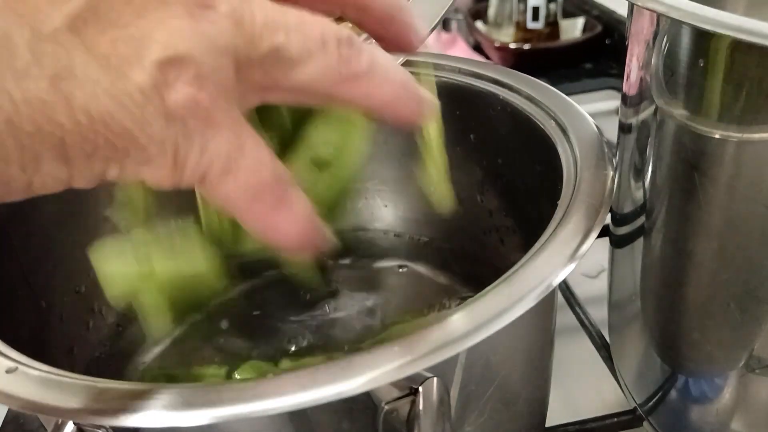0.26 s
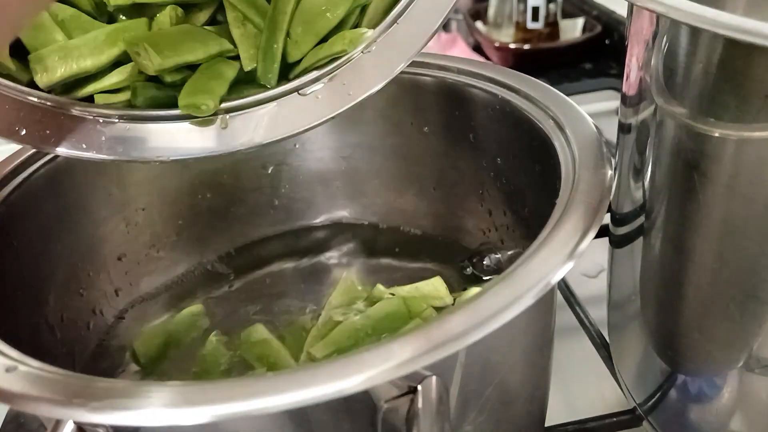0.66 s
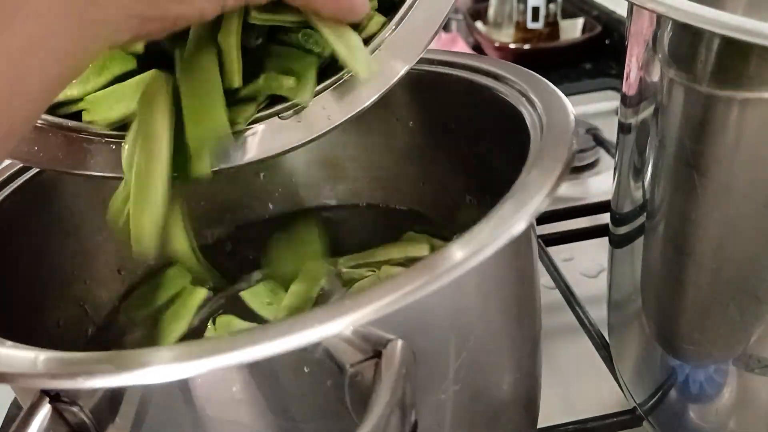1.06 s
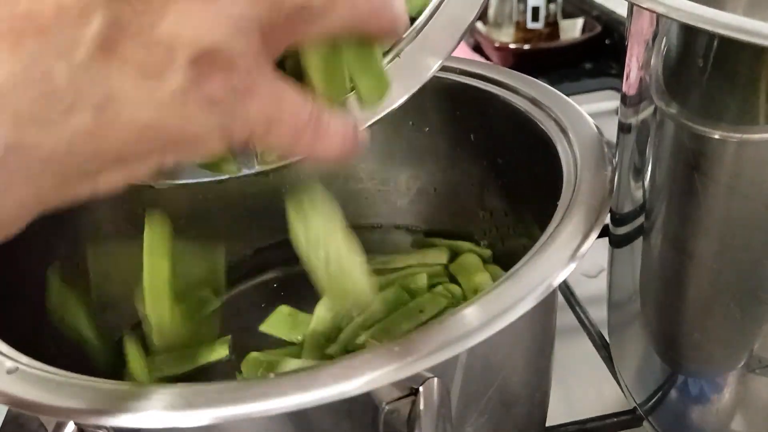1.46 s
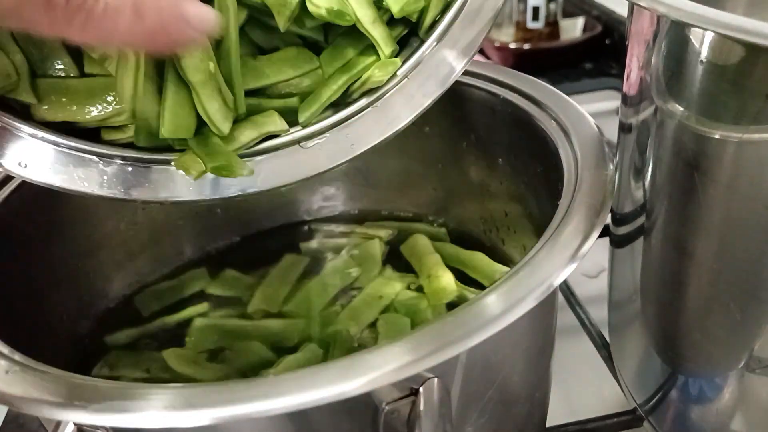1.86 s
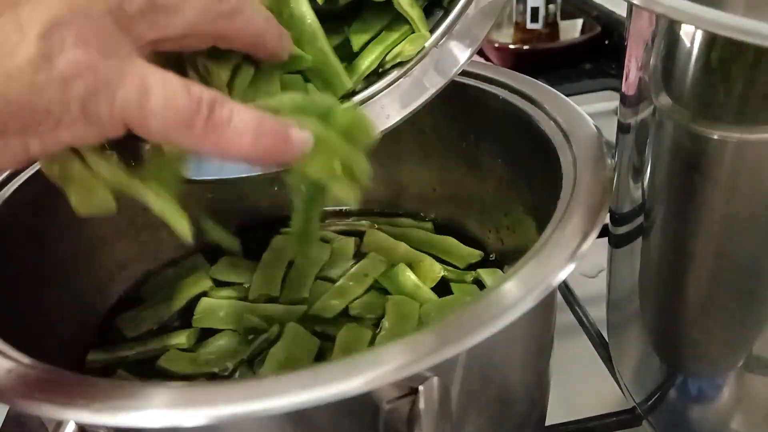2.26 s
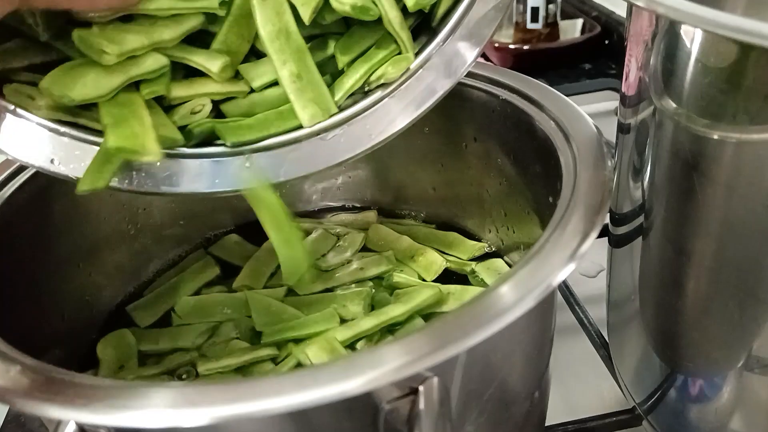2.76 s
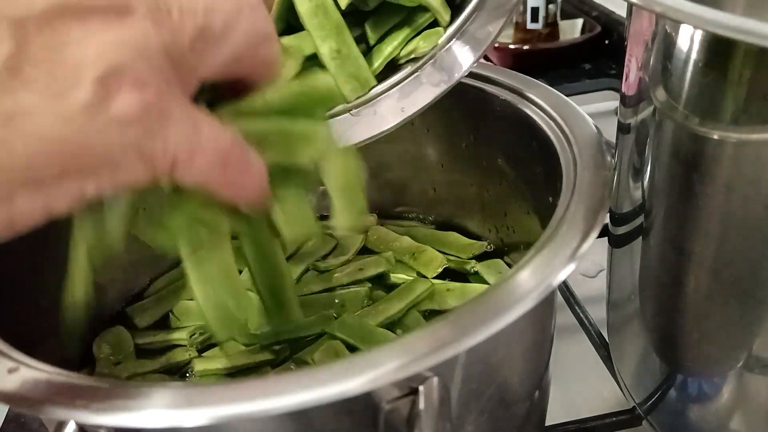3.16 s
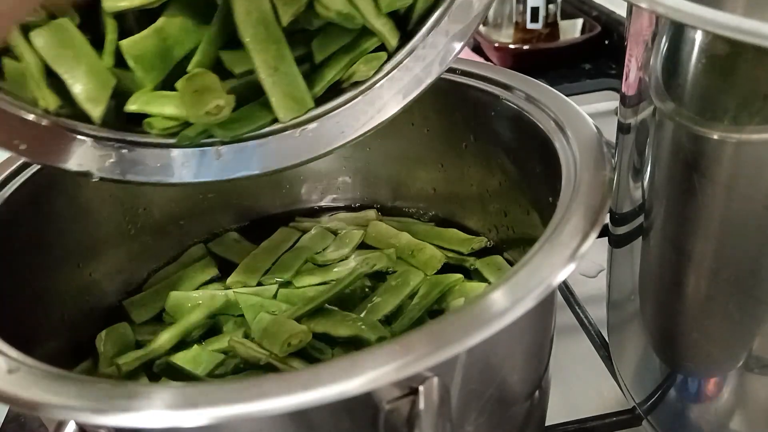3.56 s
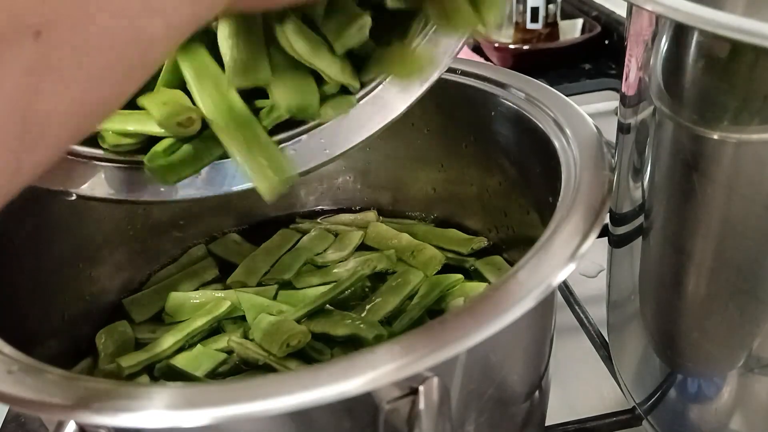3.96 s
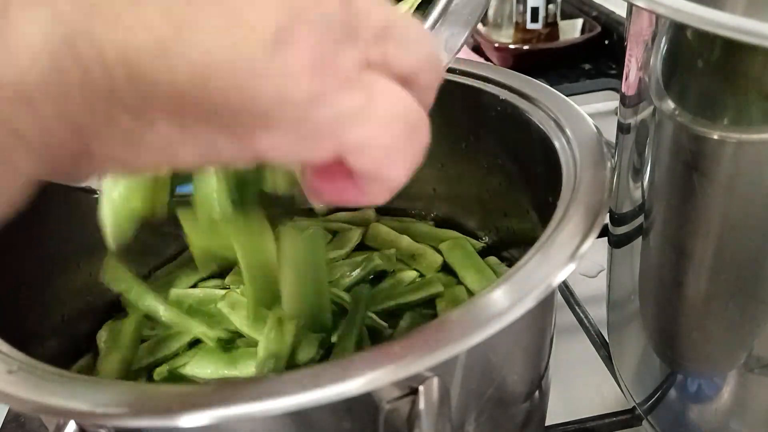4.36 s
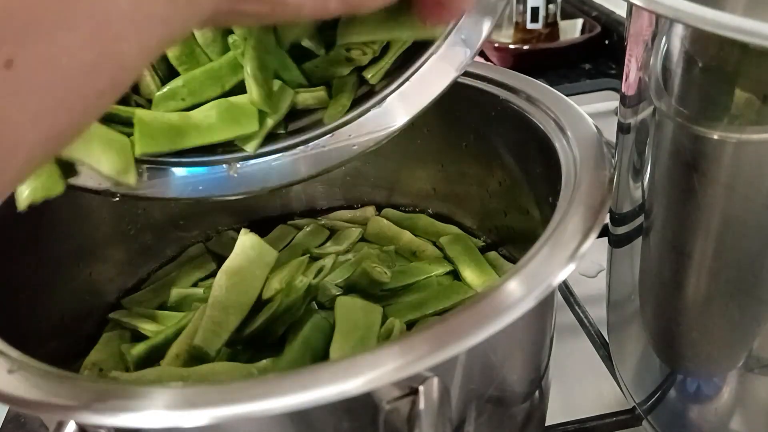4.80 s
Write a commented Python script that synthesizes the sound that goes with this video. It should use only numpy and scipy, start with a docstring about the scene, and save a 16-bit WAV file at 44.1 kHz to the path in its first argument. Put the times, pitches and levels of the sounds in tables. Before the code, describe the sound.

Close by, cut beans drop into water in a steel pot, splashing then thudding hollowly over a softly hissing gas flame.

```python
"""Cut green beans drop by the handful into a pot of water on a gas ring, heard close in a small kitchen.
The first splash and plop, later ones thud on the floating heap; every landing rings the pot's hollow.
Between handfuls, fingers rake the damp pods through a steel bowl: they rustle, squish and squeak.
Underneath, the pot murmurs, the flame rumbles and the gas jet hisses.
A stereo pair of microphones stands at the stove, with pot and jet a little to the left."""
import sys
import numpy as np
from scipy import signal
from scipy.fft import rfft, irfft, next_fast_len
from scipy.io import wavfile
from scipy.ndimage import uniform_filter1d

SR = 44100
rng = np.random.default_rng(int(sys.argv[2]) if len(sys.argv) > 2 else 0)


def waveform_to_disk(signal):
    """Save audio, clipped to [-1, 1], as 16-bit WAV at the path in sys.argv[1]."""
    frames = np.transpose(np.atleast_2d(signal))
    scaled = np.clip(frames, -1, 1) * 32767
    samples = np.round(scaled).astype(np.int16)
    wavfile.write(sys.argv[1], SR, samples)


N = 221990
TIME = np.arange(N) / SR
AGE = TIME[:SR // 2]   # seconds since a hit began

# clumps landing in the pot: (time [s], level [dB], slap against that level [dB])
LANDINGS = [(0.03, -36, -34), (0.160, -36, -30), (0.233, -35.5, -5.5), (0.296, -28, -24),
            (0.388, -23, -15.5), (0.433, -32, -9), (0.481, -31, -2.5), (0.498, -21.5, -8.5),
            (0.543, -21.5, -18), (0.68, -27.5, -59), (1.388, -5, -9.5), (1.414, -13, -19.5),
            (1.444, -16, -21), (1.642, -24, -15), (1.654, -23.5, -10), (1.776, -22, -45),
            (1.814, -18.5, -8.5), (1.850, -21.5, -5.5), (1.883, -18.5, -14), (1.933, -26.5, -15.5),
            (2.031, -21, -23), (2.046, -20, -37), (2.091, -18, -22.5), (2.108, -19.5, -34),
            (2.173, -29, -28), (2.25, -33.5, -5.5), (2.281, -18.5, -33), (2.48, -21, -17),
            (2.515, -22.5, -20), (2.573, -28, -28), (2.599, -15.5, -19), (2.655, -23.5, -9),
            (2.709, -23, -18.5), (2.73, -25, -31), (2.772, -23.5, -28.5), (3.02, -32, -19),
            (3.119, -11.5, -21), (3.231, -16, -26.5), (3.24, -17, -40), (3.394, -24.5, -40),
            (3.452, -29, -13), (3.514, -22, -24), (4.267, -21, -16.5), (4.306, -29, -30), (4.338, -21, -16),
            (4.454, -27, -10.5), (4.632, -35, -10), (4.657, -24.5, -12), (4.69, -31, -10.5),
            (5.02, -25, -8.5)]
# handfuls pouring in: (full flow from [s], hold [s], build-up [s], tumble [dB], squelch [dB])
HANDFULS = [(0.208, 0.1, 0.15, -47.5, -45), (0.476, 0.071, 0.22, -35.5, -31.5),
            (1.406, 0.12, 0.36, -33.5, -39), (1.84, 0.082, 0.78, -44, -60), (2.601, 0.11, 0.57, -40, -42.5),
            (3.385, 0.16, 0.12, -37, -51.5), (4.313, 0.053, 0.11, -35, -37), (4.60, 0.069, 0.15, -34, -46)]
# smacks on the water and bursting drops: (time [s], ping pitch [Hz], snap [dB], spit [dB])
SMACKS = [(0.206, 8200, -28, -41.5), (0.234, 9280, -35, -55), (0.349, 8240, -26.5, -49),
          (0.4317, 7200, -27, -73), (0.4544, 9000, -10, -57), (0.583, 7430, -26, -58),
          (0.59, 7460, -30, -70), (1.3018, 8470, -21, -52), (1.328, 8000, -19.5, -47),
          (1.35, 8250, -6.5, -19), (1.3896, 7110, -16, -22.5), (1.835, 7700, -21, -44),
          (1.904, 6100, -16, -68), (2.601, 7100, -29.5, -48), (2.769, 7360, -32, -59.5),
          (3.118, 7470, -23.5, -41), (4.2673, 7390, -26.5, -57)]
# pitched plops in the water and brief ringing notes of the pot:
# (time [s], pitch [Hz], level [dB], t60 [s])
PLOPS_AND_NOTES = [(0.362, 523, -23, 0.11), (1.260, 1150, -20, 0.038), (1.332, 1167, -21.5, 0.056),
                   (1.359, 3344, -10.5, 0.13), (1.389, 966, -8.5, 0.11), (1.389, 514, -7, 0.17),
                   (1.390, 760, -17, 0.062), (1.398, 609, -13, 0.085), (1.395, 3024, -19, 0.22),
                   (1.435, 227, -22, 0.17), (1.505, 2925, -28, 0.12), (2.047, 1000, -32.5, 0.12),
                   (2.091, 612, -17, 0.13), (2.497, 1178, -17, 0.085), (2.644, 1160, -25.5, 0.045),
                   (2.675, 1160, -23.5, 0.038), (3.119, 480, -16.5, 0.069), (3.122, 303.4, -33, 0.5),
                   (3.128, 614.3, -20.5, 0.23), (3.484, 1190, -26.5, 0.092), (3.513, 796, -27.5, 0.069),
                   (4.341, 973, -30, 0.063), (4.563, 1200, -19.5, 0.052), (4.580, 1237, -23, 0.13),
                   (4.66, 527, -25, 0.086), (4.70, 680, -26, 0.13)]
# wet pods squashing together: (time [s], centre [Hz], level [dB])
SQUISHES = [(0.174, 1360, -45), (0.201, 2790, -38), (0.259, 2700, -42.5), (0.301, 2810, -43),
            (0.386, 1800, -39), (0.496, 2340, -35.5), (0.544, 2630, -36.5), (1.251, 2450, -42.5),
            (1.391, 2350, -32.5), (1.552, 1700, -37), (1.901, 2310, -41.5), (2.087, 2500, -45.5),
            (2.169, 1720, -49), (2.497, 2300, -47), (2.515, 2060, -39.5), (2.578, 2500, -48),
            (2.639, 2950, -42.5), (2.67, 2070, -38.5), (2.772, 2260, -46.5), (3.482, 1930, -40),
            (4.266, 1930, -36), (4.305, 2530, -39), (4.421, 2400, -41.5), (4.517, 2310, -42),
            (4.603, 2460, -36)]
# finger strokes through the bowl: (start [s], hold [s], level [dB])
RAKES = [(0, 0.014, -43), (0.814, 0.21, -43), (2.151, 0.24, -42), (2.493, 0.26, -46.5), (3.002, 0.19, -42),
         (3.434, 0.12, -50.5), (3.876, 0.22, -44), (4.034, 0.3, -41), (4.6, 0.052, -41),
         (4.867, 0.14, -41.5)]
# damp pods squeaking: (middle [s], half length [s], pitch [Hz], level [dB])
SQUEAKS = [(0.84, 0.0081, 6900, -27), (0.954, 0.0028, 7500, -29.5), (0.976, 0.012, 7360, -33.5),
           (1.703, 0.012, 7000, -38.5), (4.149, 0.012, 5170, -34), (4.2, 0.025, 5500, -44),
           (4.979, 0.006, 6900, -31.5)]
# fingers nudging the bowl: (time [s], level [dB], best excited pitch [Hz])
NUDGES = [(2.39, -21.5, 1670), (3.878, -31, 2100), (4.172, -36.5, 1200)]

# resonances: (frequency [Hz], level [dB], t60 [s])
HOLLOW_MODES = [(180, -14, .14), (233, -15, .26), (302, -12, .3), (375, -21, .16), (472, -4, .12),
                (521, 1, .19), (612, 1, .2), (650, -6, .14), (787, -12, .15), (968, -10, .15),
                (1120, -10, .1), (1185, -6, .11), (1243, -6, .11)]   # the air above the water
WALL_MODES = [(2815, -2, .4), (2955, 0, .28), (3058, -2, .28), (3333, -2, .28), (3564, -4, .28),
              (3800, -5, .11), (4907, -3, .16), (5785, -2, .16)]   # the pot's steel wall
BOWL_MODES = [(1238, -3, .14), (1497, -5, .17), (1545, -7, .05), (2055, -2, .15), (2110, -1, .05),
              (3709, -6, .05)]   # the steel bowl

# noise colours: (frequency [Hz], spectral density [dB])
SLAP_SPECTRUM = [(100, -25.5), (200, 5.5), (380, 17), (560, 20.5), (820, -8), (1150, 5.5), (1500, -10),
                 (1850, 2), (2300, -1), (3000, -6.5), (4200, -17), (8000, 0), (14000, -47)]   # a blow scattered inside the pot
SMACK_SPECTRUM = [(1500, -10.5), (2600, -9), (3300, -9), (4000, -5.5), (4700, -1.5), (5300, -4), (6700, 9),
                  (8200, 8.5), (9300, 2.5), (11700, -7), (13000, -10), (16000, -29.5)]   # a crack on the water
SPRAY_SPECTRUM = [(700, -28.5), (1500, -17), (2300, -39), (3000, 4.5), (4000, 10), (5000, 8), (7000, 22.5),
                  (10000, 2), (12500, -10.5), (16000, -29)]   # fine drops
SQUELCH_SPECTRUM = [(500, -21), (1100, -6.5), (1850, -5), (2300, 3.5), (2650, -6.5), (3000, 4), (3500, -11),
                    (5000, 0), (7000, 8.5), (10000, -5.5), (14000, -16)]   # wet skins parting, coloured by the pot
RUSTLE_SPECTRUM = [(1000, -15.5), (1650, -13.5), (2200, 1), (2800, -12.5), (4000, -14), (5000, -15.5),
                   (6000, -2.5), (6900, 4.5), (7900, 3.5), (8800, -5), (10000, -17.5), (12500, -37.5),
                   (16000, -55)]   # pods rubbing
MURMUR_SPECTRUM = [(90, -13.5), (170, 2), (218, 8), (236, 16.5), (256, -3.5), (303, 3.5), (335, -9),
                   (400, -6.5), (700, -24.5), (1500, -50.5)]   # the heated pot
FLAME_SPECTRUM = [(20, -76), (50, -64), (72, -18.5), (90, -9), (100, 5), (110, -3.5), (125, -0.5),
                  (145, -8.5), (300, -15.5), (600, -39), (4000, -44)]   # the burning gas
JET_SPECTRUM = [(1500, -16), (1950, -23), (2250, 6.5), (2750, -27.5), (4600, -21), (5500, -2),
                (6300, -25.5), (6850, -0.5), (7150, -64), (7700, 9.5), (8150, 17.5), (8450, -2.5),
                (8800, -3.5), (9400, -2.5), (11000, -13.5), (13000, -31.5), (16000, -85.5)]   # gas leaving the jet

# likeness of the left and right microphones: (frequency [Hz], correlation [0-1])
MIC_LIKENESS = [(60, 0.93), (150, 0.99), (300, 0.71), (600, 0.65), (1200, 0.3), (2500, 0), (15000, 0.25)]

TRAIL_DB_PER_S = 294   # a handful trails off
WET_QUICKNESS = 2.9   # spray and squelching gather in the thick of a handful


def landings(thump_hz=300, ring_hz=440, slap_hz=860, middling_db=-18):
    """Heavy clumps thump, flat pieces slap, and all of them ring the hollow above the water."""
    out = np.zeros((2, N))
    for s, db, slap_db in LANDINGS:
        weight_db = .72 * (db - middling_db)   # heavier clumps thump more
        thump_db = db + with_heap(s, open_db=-35, covered_db=-21.5) + weight_db
        # each clump lands elsewhere and favours other notes of the pot
        ring_band = np.array([ring_hz, slap_hz]) * 2 ** (.12 * rng.uniform(-1.5, 1))
        blow = pot_response() * (1 + from_db(-4) * fade(.05))   # the impact stands out over its ring
        thump = from_db(thump_db) * unit_onset(passed(blow, [120, thump_hz], "band"))
        ring = from_db(db - 13.5) * unit_onset(passed(blow, ring_band, "band", order=2))
        spurts = passed(blow, slap_hz, "high", order=5) * spatter(per_s=260, depth_db=3.5)
        slap = from_db(db + slap_db) * unit_onset(spurts)
        add(out, s, thump * pan(3.2) + ring * pan(1.6) + slap * pan(-.8))
    return out


def pot_response():
    """One soft blow in the pot: air modes detuned by heaving water, and scatter between the walls."""
    heave = 1 + .006 * rng.standard_normal()
    modes = ringing([(hz * heave, db, t60) for hz, db, t60 in HOLLOW_MODES], spread_db=9.5)
    scatter = noise(SLAP_SPECTRUM) * (fade(.21) + fade(.012))
    return (unit_onset(modes) + from_db(-3.5) * unit_onset(scatter)) * attack(.002)


def tumble(gulp_db=-8.5):
    """Small pieces patter into the pot, each trapping a bubble."""
    pieces = [unit_onset(pot_response()) + from_db(gulp_db) * unit_onset(rising_note(hz, 22 / hz))
              for hz in np.geomspace(480, 1300, 12)]
    falling = patter(pieces, flow(TRAIL_DB_PER_S), per_s=210, spread_db=5)
    return passed(falling, 182, "high", order=2) * pan(.46)


def flow(fall_db_per_s, quickness=1):
    """Level in dB of the falling beans, dying away after each handful."""
    return together(swell(s, hold_s, db, attack_s / quickness, fall_db_per_s)
                    for s, hold_s, attack_s, db, _ in HANDFULS)


def with_heap(s, open_db, covered_db, covered_s=2.9):
    """A level in dB that shifts as the floating heap covers the water."""
    return open_db + (covered_db - open_db) * np.minimum(s / covered_s, 1)


def smacks(split_hz=5200):
    """A crack and a tiny bubble's ping spatter round the pot and ring its water-damped wall."""
    out = np.zeros((2, N))
    for s, hz, snap_db, spit_db in SMACKS:
        crack = noise(SMACK_SPECTRUM) * fade(.019)
        echo = passed(noise(SMACK_SPECTRUM), 7000, "low", order=2) * fade(.13)
        echo *= spatter(per_s=220, depth_db=3.5)
        burst = (crack + from_db(-14.5) * echo) * attack(.0044)
        ping = from_db(-2) * unit_onset(rising_note(hz, .022) * (1 - fade(.008)))
        treble = unit_onset(passed(burst, split_hz, "high"))
        snap = from_db(snap_db - 11) * unit_onset(treble + ping)
        spit = from_db(spit_db + 3) * unit_onset(passed(burst, [400, split_hz], "band"))
        wall = from_db(spit_db - 6) * unit_onset(ringing(WALL_MODES, spread_db=2) * fade(.6))
        add(out, s, snap + spit + wall)
    return out * pan(3.3)


def plops_and_notes(hollow_db=-15):
    """Pitched plops in the water and brief ringing notes of the pot; each wakes the hollow nearby."""
    out = np.zeros((2, N))
    for s, hz, db, t60 in PLOPS_AND_NOTES:
        hollow = unit_onset(passed(pot_response(), [hz / 1.2, hz * 1.2], "band", order=2))
        add(out, s, from_db(db) * (rising_note(hz, t60) + from_db(hollow_db) * hollow))
    return out * pan(.42)


def rising_note(hz, t60, rise=.026):
    """A note swells in a cycle or two, rings and sharpens a little, as a surfacing bubble does."""
    pitch = hz * (1 + rise * (.5 - fade(t60)))
    apart = mic_phase(hz) * rng.uniform(-.7, .7) * np.array([[1], [-1]])
    return np.sin(2 * np.pi * np.cumsum(pitch) / SR + apart) * fade(t60) * attack(1 / hz) ** 2


def spray():
    """Fine drops crackle with tiny bubbles, fainter as the heap hides the water."""
    drops = []
    for hz in np.geomspace(900, 3200, 14):
        crackle = unit_onset(noise(SPRAY_SPECTRUM) * (fade(.03) - fade(.002)))
        drops.append(crackle + from_db(-3) * unit_onset(rising_note(hz, 24 / hz)))
    level_db = flow(TRAIL_DB_PER_S, WET_QUICKNESS) + with_heap(TIME, open_db=7.5, covered_db=-23.5)
    return patter(drops, level_db, per_s=380, spread_db=4) * pan(.5)


def squelches():
    """Air squeezed from between wet pods escapes in a swarm of tiny splats."""
    pressed = [swell(s, hold_s, db, attack_s / WET_QUICKNESS, WET_QUICKNESS * TRAIL_DB_PER_S)
               for s, hold_s, attack_s, _, db in HANDFULS]
    splats = [splat(hz, t60=.04, width=.16) for hz in np.geomspace(1400, 3400, 14)]
    return patter(splats, together(pressed) - 5, per_s=450, spread_db=3.2) * pan(2.5)


def squishes():
    """Wet pods squash together in larger, single splats."""
    out = np.zeros((2, N))
    for s, hz, db in SQUISHES:
        add(out, s, from_db(db) * splat(hz, t60=.084, width=.072))
    return out * pan(1.55)


def splat(hz, t60, width):
    """A wet sputter through the gap between two pods, with the plip of the air caught there."""
    edge = 1 + width
    sputter = noise(SQUELCH_SPECTRUM) * spatter(per_s=350, depth_db=4.5) * fade(t60) * attack(.0008)
    sputter = unit_onset(passed(sputter, [hz / edge, hz * edge], "band", order=1))
    plip = from_db(-6) * unit_onset(rising_note(hz, .03, rise=.08) * (1 - fade(.012)))
    return unit_onset(sputter + plip)


def rustle(settling_db=-55.5):
    """Pods rub under the fingers and settle in the tilted bowl; single ones tick past each other."""
    rubs = [noise(RUSTLE_SPECTRUM) * (fade(.05) - fade(.008)) for _ in range(8)]
    flicks = [passed(rub, [.9 * hz, 1.1 * hz], "band", order=2)
              for rub, hz in zip(rubs, np.geomspace(5800, 7900, 8))]
    strokes = [swell(s, hold_s, db, attack_s=.039, fall_db_per_s=99) for s, hold_s, db in RAKES]
    handling_db = together(strokes + [settling_db])
    rubbing = patter(rubs, handling_db, per_s=600, spread_db=3)
    ticks = patter(flicks, handling_db - 9, per_s=45, spread_db=4)
    return (rubbing + ticks) * pan(.14)


def squeaks(edge=1.125):
    """Pod skins stick and slip in a short, narrow, rough chirp."""
    out = np.zeros((2, N))
    for s, half_s, hz, db in SQUEAKS:
        band = [(hz / edge ** 4, -45), (hz / edge, -9), (hz, 0), (hz * edge, -9), (hz * edge ** 4, -50)]
        envelope = np.exp(-(AGE / half_s - 3) ** 2)
        add(out, s - 3 * half_s, from_db(db) * noise(band) * envelope)
    return out


def bowl_clinks(fall_db_per_octave=30):
    """The hand-held bowl clinks dully under a soft scuff; shifting pods choke it unevenly."""
    out = np.zeros((2, N))
    for s, db, centre_hz in NUDGES:
        modes = [(hz, mode_db - fall_db_per_octave * abs(np.log2(hz / centre_hz)), t60)
                 for hz, mode_db, t60 in BOWL_MODES]
        rub = passed(noise(SQUELCH_SPECTRUM), [.8 * centre_hz, 1.2 * centre_hz], "band")
        scuff = from_db(-8) * unit_rms(rub) * fade(.07)
        clink = ringing(modes, spread_db=1) * spatter(per_s=90, depth_db=2.5)
        add(out, s, from_db(db) * (clink + scuff) * attack(.0045))
    return out


def pot_murmur(calm_db=-58.5):
    """The heated pot murmurs low, most when a handful has just stirred it."""
    stirred_db = flow(fall_db_per_s=28) + with_heap(TIME, open_db=-27, covered_db=-5.5)
    level_db = together([stirred_db, calm_db]) + 2.52 * drift(7.8)
    return from_db(level_db) * noise(MURMUR_SPECTRUM, N) * pan(1.54)


def flame():
    """The flame flutters and rumbles under the pot."""
    return from_db(-49.5 + .4 * drift(31)) * noise(FLAME_SPECTRUM, N) * pan(2.2)


def gas_jet():
    """The jet hisses from the left, its low and high notes wavering separately."""
    hiss = noise(JET_SPECTRUM, N)
    bands = [passed(hiss, 4000, kind) * from_db(2.2 * drift(30) + 1.5 * drift(7))
             for kind in ("low", "high")]
    left, right = from_db(-48) * sum(bands)
    shaded = passed(right, 6300, "low", order=2)   # the pot hides the jet from the right microphone
    return np.array([from_db(4) * left, from_db(-1.5) * shaded])


def kitchen(x, t60=.28, wall_hz=6500):
    """The small room answers with a short diffuse tail, dulled by the walls."""
    diffuse = passed(rng.standard_normal((2, len(AGE))), wall_hz, "low", order=1)
    return convolved(x, diffuse * fade(t60) * attack(.00053))


def ringing(modes, spread_db):
    """A strike reaches every mode with its own strength and sign."""
    out = 0
    for (hz, db, t60), (strength, sign, side) in zip(modes, rng.standard_normal((len(modes), 3))):
        apart = mic_phase(hz) * np.sign(side) * np.array([[.5], [-.5]])
        gain = np.sign(sign) * from_db(db + spread_db * min(strength, 1))
        out = out + gain * fade(t60) * np.sin(2 * np.pi * hz * AGE + apart)
    return out


def patter(responses, level_db, per_s, spread_db):
    """Random contacts of uneven size, each sounding one response; their power follows the level."""
    sizes = from_db(spread_db * np.minimum(rng.exponential(1, N), 4)) * rng.choice([-1, 1], N)
    clicks = sizes * (rng.random(N) < per_s / SR)
    local_rms = np.sqrt(np.abs(uniform_filter1d(clicks ** 2, size=2600)) + 1e-6)
    clicks = clicks / local_rms * from_db(level_db)
    dealt = rng.integers(0, len(responses), N)
    return sum(convolved((clicks * (dealt == k))[None], r) for k, r in enumerate(responses))


def noise(spectrum, size=len(AGE)):
    """Coloured noise at rms 1, alike at both microphones in the bass and barely so in the treble."""
    padded = next_fast_len(size)
    mid, side = rfft(rng.standard_normal((2, padded)))
    hz = np.arange(len(mid)) * SR / padded
    alike = at_hz(MIC_LIKENESS, hz)
    both = np.sqrt(1 + alike) * mid + np.sqrt(1 - alike) * side * [[1], [-1]]
    return unit_rms(irfft(both * from_db(at_hz(spectrum, hz)), padded)[:, :size])


def mic_phase(hz):
    """Angle in radians between the microphones: higher notes meet them out of step."""
    return np.arccos(at_hz(MIC_LIKENESS, hz))


def swell(start_s, hold_s, db, attack_s, fall_db_per_s):
    """Level in dB of one gesture: rounded rise of 31 dB over attack_s, hold, release."""
    early_s = np.maximum(start_s - TIME, 0)
    late_s = np.maximum(TIME - start_s - hold_s, 0)
    return db - 31 * (early_s / attack_s) ** 2 - fall_db_per_s * late_s


def together(levels_db):
    """Level in dB of overlapping gestures."""
    return 10 * np.log10(sum(from_db(db) ** 2 for db in levels_db) + 1e-14)


def spatter(per_s, depth_db):
    """Uneven gain that breaks a short sound into spurts; steady at the very start."""
    knots = rng.standard_normal(1000)
    wobble = np.interp(AGE * per_s, np.arange(len(knots)), knots)
    return from_db(depth_db * wobble * (1 - fade(.03)))


def drift(per_s):
    """A random wander at rms 1."""
    knots = rng.standard_normal(2000)
    return unit_rms(np.interp(TIME * per_s, np.arange(len(knots)), knots))


def from_db(db):
    return 10 ** (np.asarray(db) / 20)


def unit_rms(x):
    return x / np.sqrt(np.mean(x ** 2) + 1e-20)


def unit_onset(x):
    """Scale a hit to rms 1 over its first 20 ms."""
    return x / np.sqrt(np.mean(x[..., :SR // 50] ** 2) + 1e-20)


def at_hz(points, hz):
    knot_hz, values = np.array(points).T
    return np.interp(np.log(hz + 1), np.log(knot_hz), values)


def pan(left_db):
    return from_db([[left_db / 2], [-left_db / 2]])


def attack(rise_s):
    return 1 - np.exp(-AGE / rise_s)


def fade(t60):
    """A fall of 60 dB in t60 seconds, 5 ms at the quickest."""
    return np.exp(-np.log(1000) * AGE / max(t60, .005))


def add(out, s, sound):
    start = int(np.clip(s * SR, 0, N - 1))
    out[:, start:start + sound.shape[-1]] += sound[..., :N - start]


def passed(x, hz, kind, order=3):
    return signal.sosfilt(signal.butter(order, hz, kind, fs=SR, output="sos"), x)


def convolved(x, response):
    """Sound x through a stereo response scaled to keep its power."""
    return signal.oaconvolve(x, response / np.sqrt(np.sum(response ** 2) / 2), axes=1)[:, :N]


def scene(right_lag_s=.0001):
    """Beans, pot and bowl up close, a little of the kitchen behind them, the stove underneath."""
    beans = landings() + smacks() + plops_and_notes() + squelches() + squishes()
    beans += bowl_clinks() + squeaks() + tumble() + spray() + rustle()
    left, right = passed(beans, 89.7, "high", order=2)   # the beans and pot carry no deep bass
    right = np.pad(right, (int(right_lag_s * SR), 0))[:N]   # the pot is nearer the left microphone
    beans = np.array([left, right])
    return beans + from_db(-16) * kitchen(beans) + flame() + gas_jet() + pot_murmur()


def record(dry, notch_hz=8400, cutoff_hz=15800):
    """The right microphone's port notches the treble; peaks clip, the lowest bass and the top are cut."""
    right = signal.lfilter(*signal.iirnotch(notch_hz, Q=4, fs=SR), dry[1])
    clipped = np.clip([dry[0], right], -1, 1)
    low_cut = passed(clipped, 41, "high", order=1)
    return signal.sosfilt(signal.ellip(10, .1, 80, cutoff_hz, fs=SR, output="sos"), low_cut)


dry = scene()
out = record(dry)
waveform_to_disk(out)
```